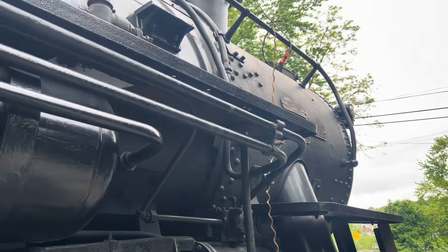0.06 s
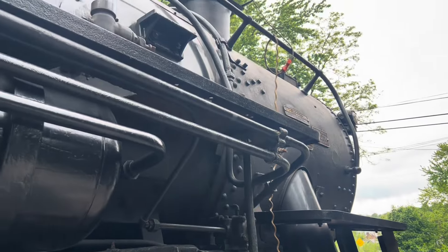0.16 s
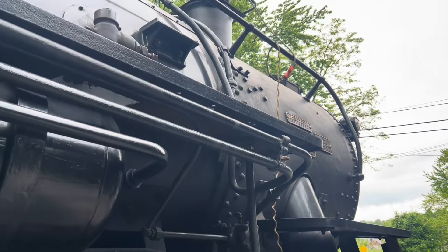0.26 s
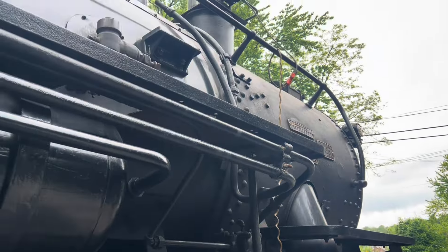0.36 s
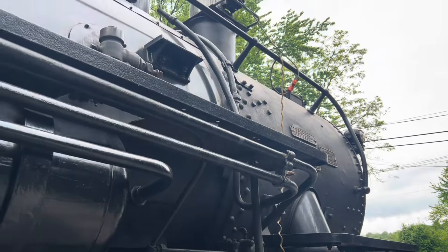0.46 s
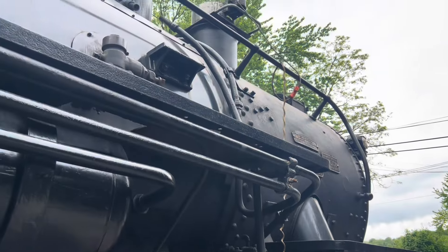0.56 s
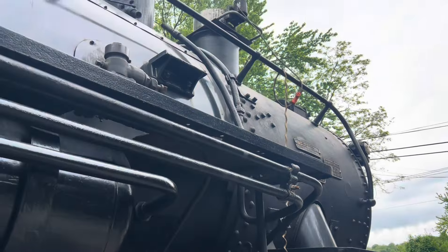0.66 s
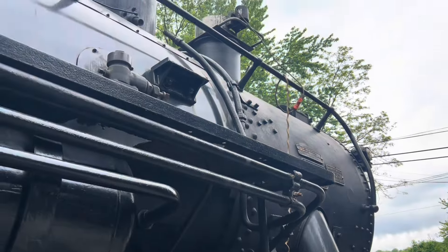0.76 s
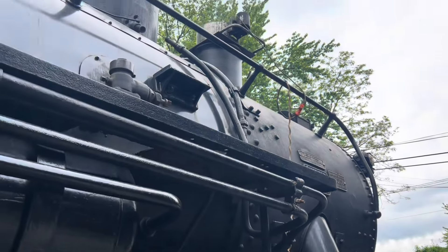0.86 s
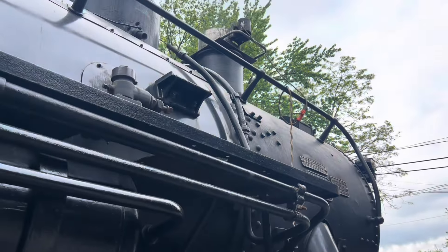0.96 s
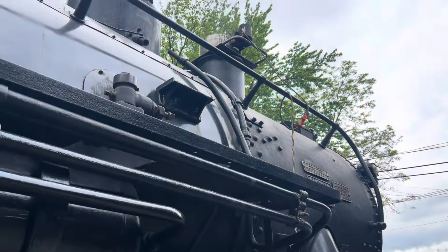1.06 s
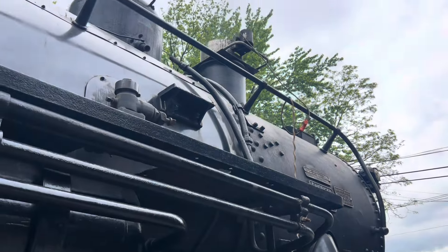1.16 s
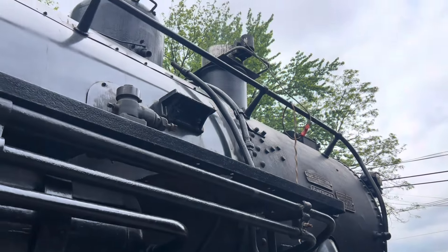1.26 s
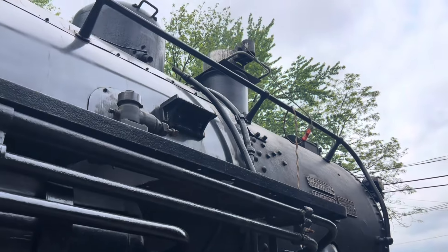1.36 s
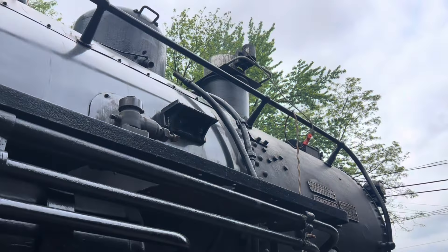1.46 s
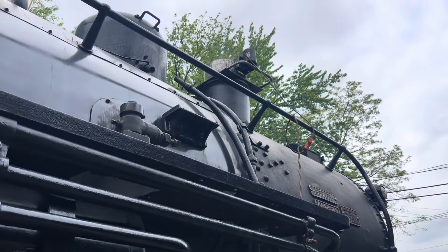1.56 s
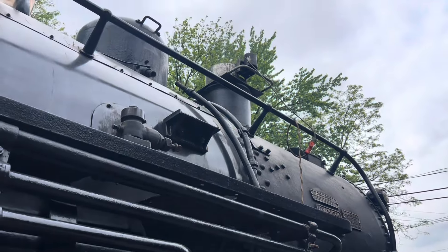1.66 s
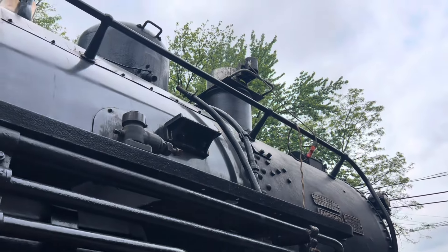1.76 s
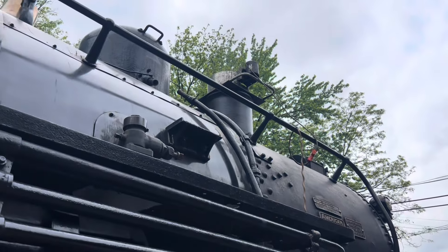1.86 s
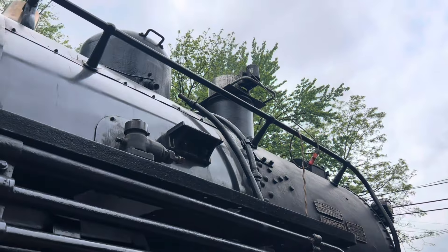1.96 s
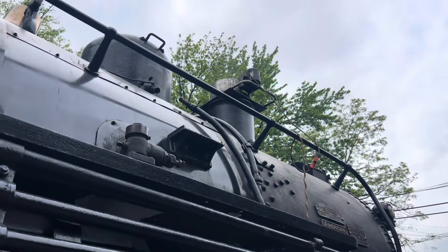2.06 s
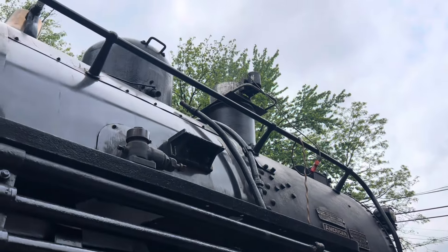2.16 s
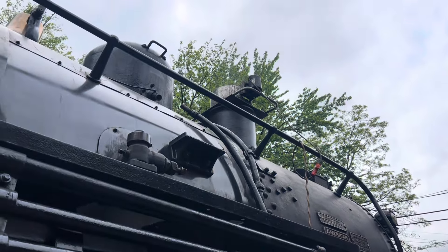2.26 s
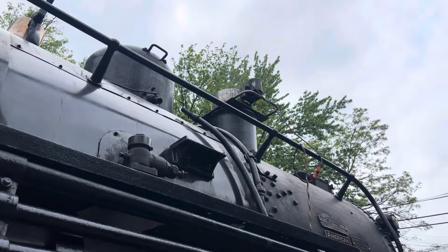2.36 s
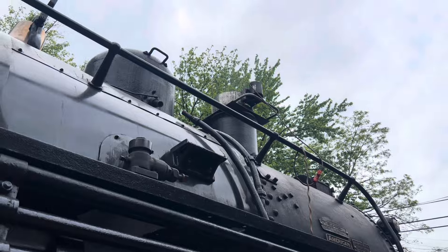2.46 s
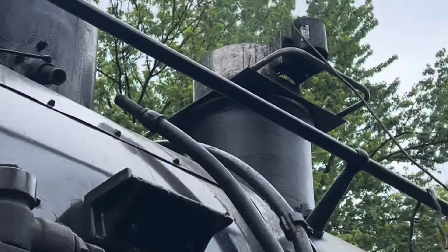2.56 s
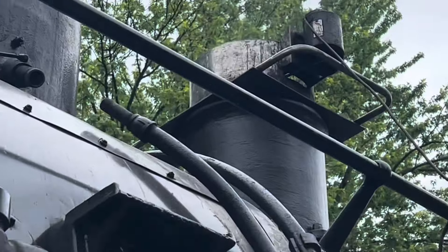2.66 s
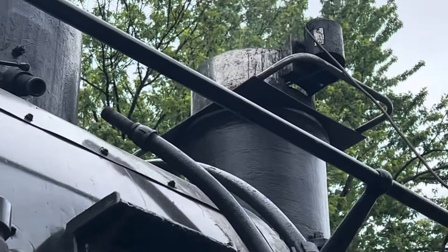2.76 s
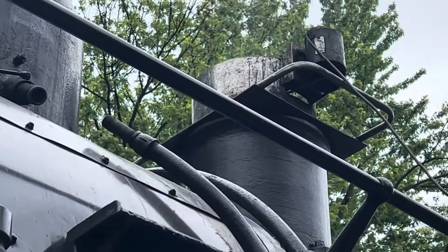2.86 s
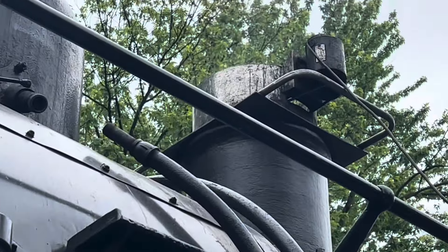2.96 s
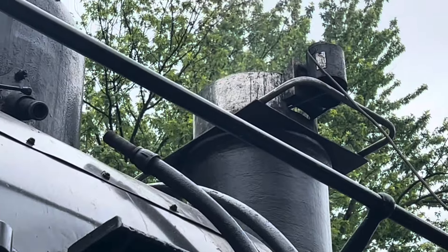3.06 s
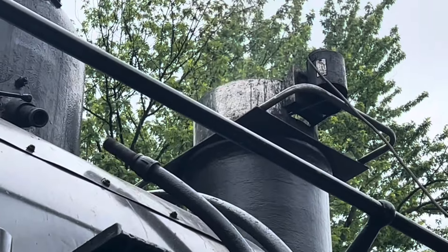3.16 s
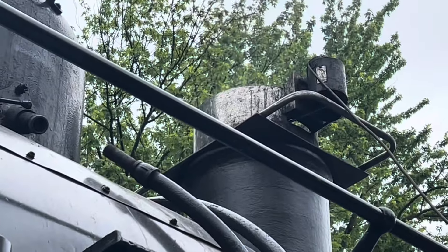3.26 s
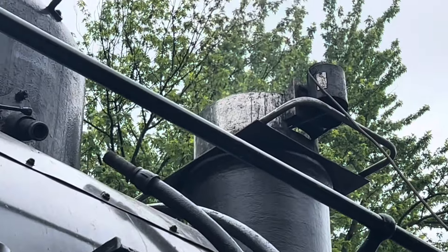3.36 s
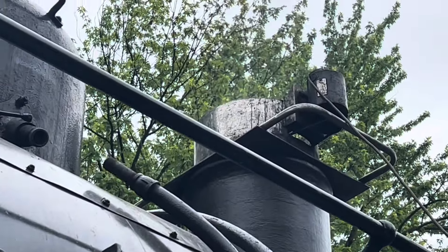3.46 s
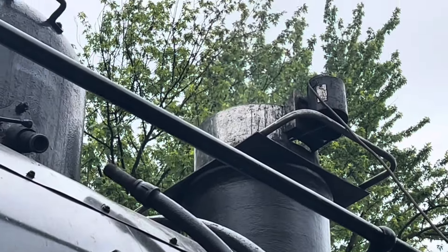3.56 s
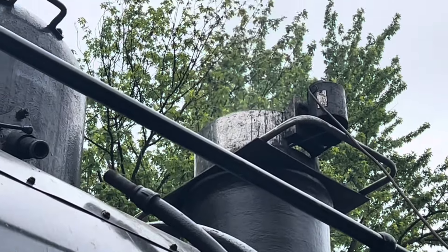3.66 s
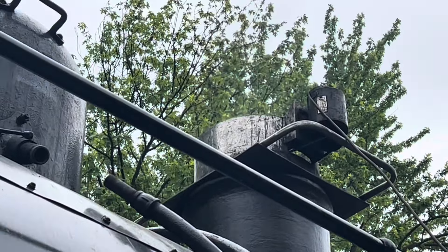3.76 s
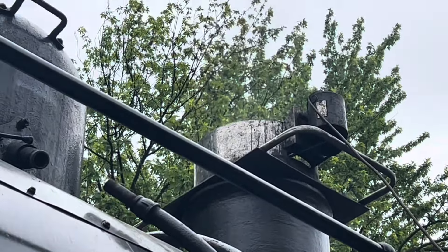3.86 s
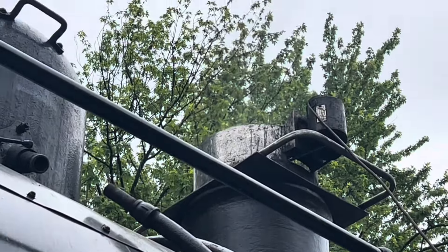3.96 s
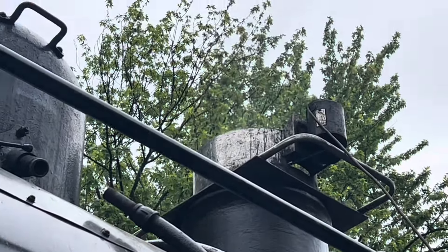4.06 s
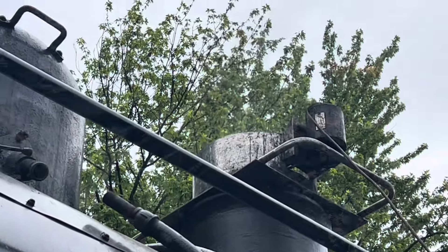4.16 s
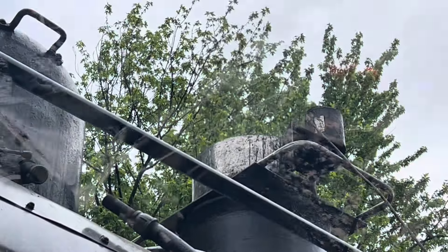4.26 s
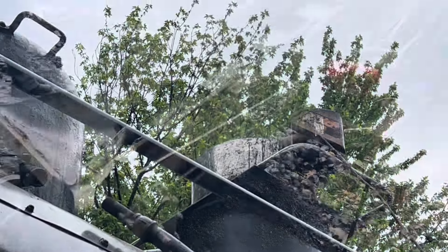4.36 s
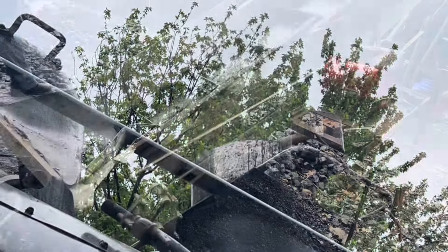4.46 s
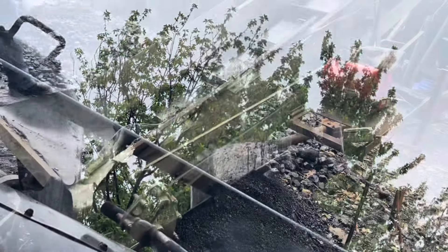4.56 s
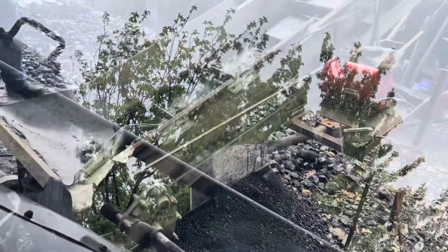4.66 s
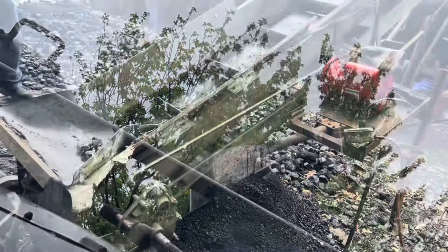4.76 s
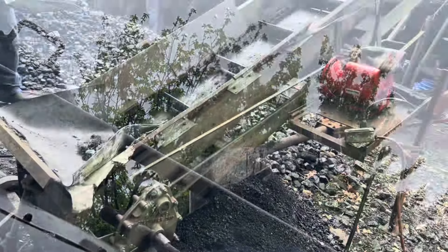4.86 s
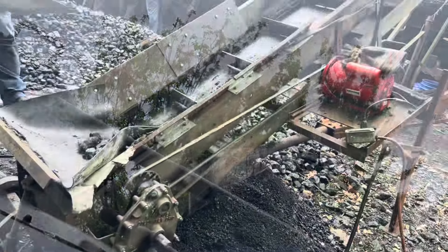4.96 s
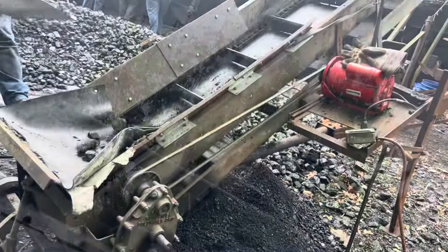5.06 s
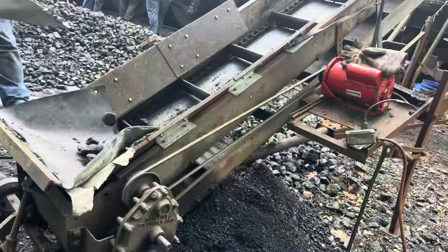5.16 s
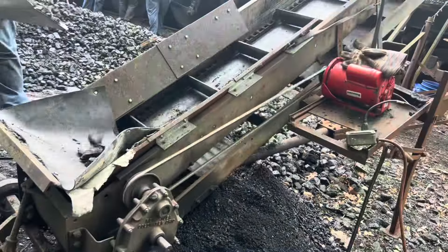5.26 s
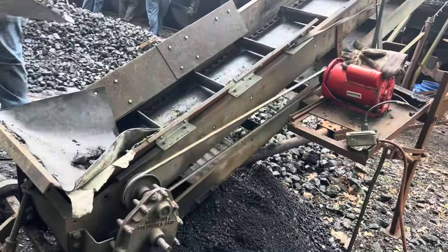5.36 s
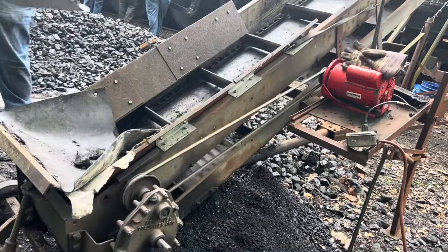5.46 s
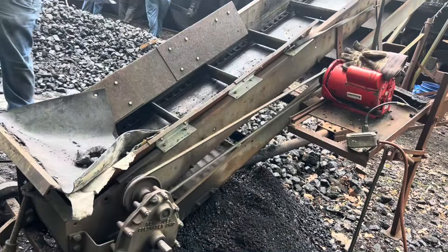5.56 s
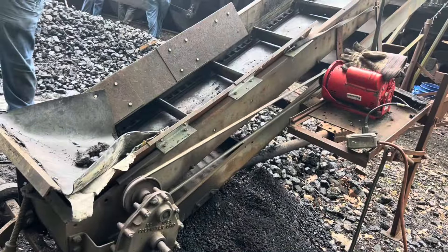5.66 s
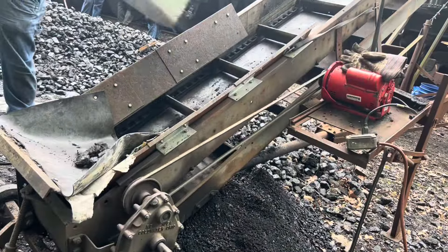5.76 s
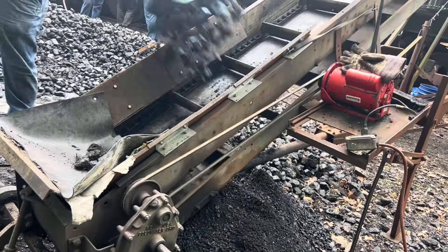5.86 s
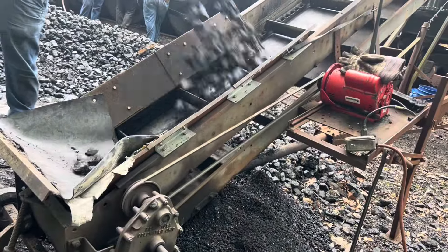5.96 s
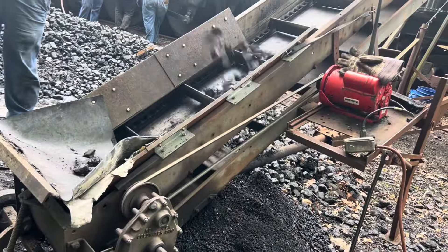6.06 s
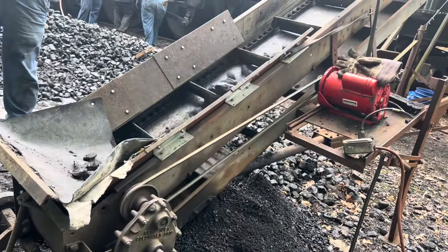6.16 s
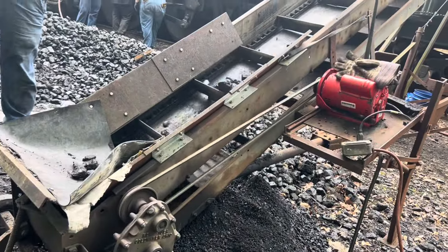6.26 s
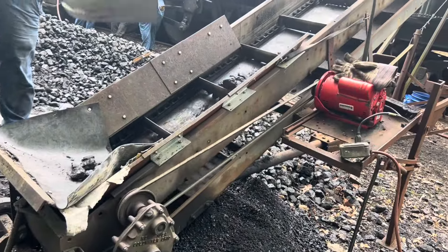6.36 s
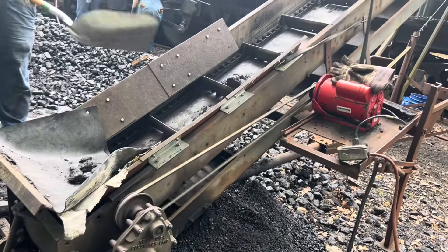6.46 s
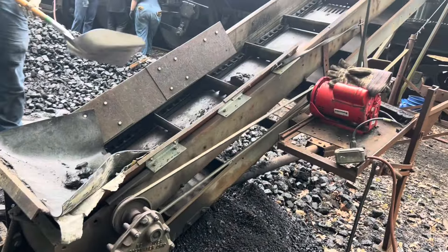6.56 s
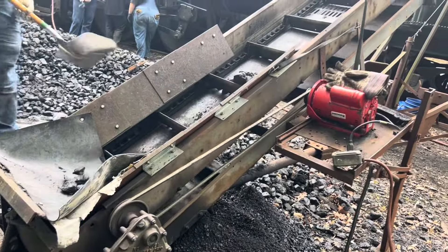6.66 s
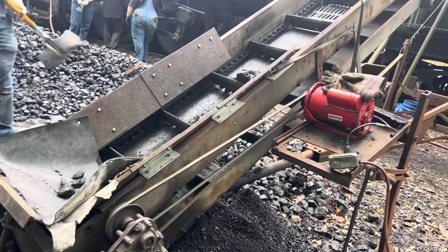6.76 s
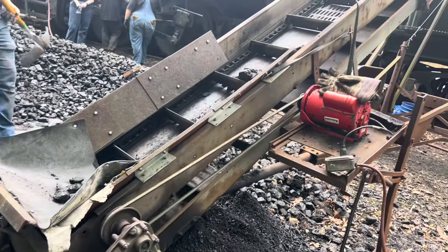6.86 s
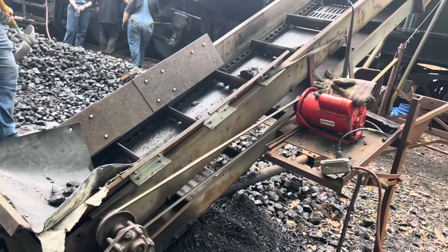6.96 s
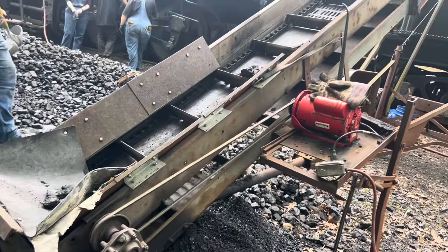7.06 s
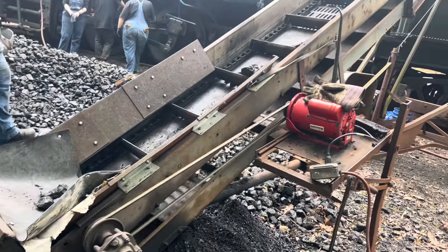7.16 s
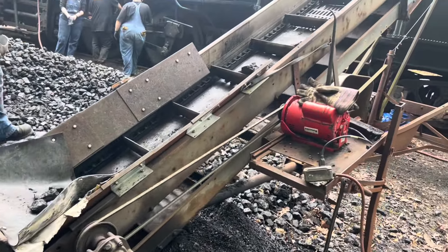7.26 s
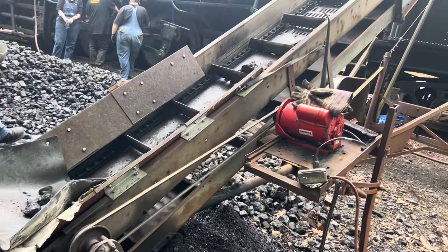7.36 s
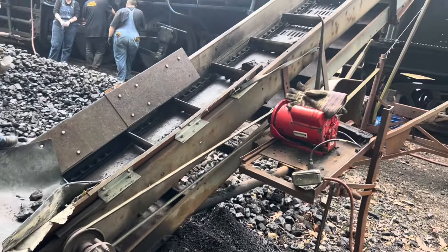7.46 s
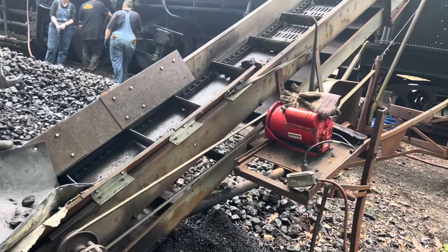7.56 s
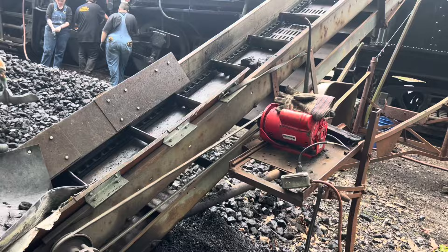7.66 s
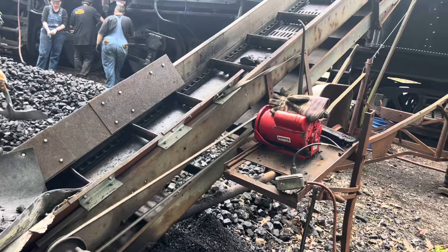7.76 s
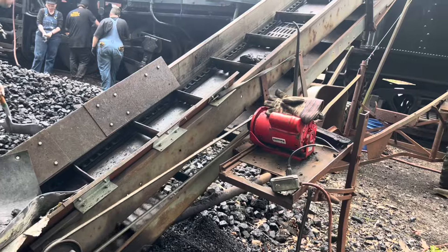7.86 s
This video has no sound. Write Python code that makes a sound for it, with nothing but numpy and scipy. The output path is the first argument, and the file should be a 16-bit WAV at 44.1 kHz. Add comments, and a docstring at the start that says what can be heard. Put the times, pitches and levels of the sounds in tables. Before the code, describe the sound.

A low steam-valve moan wavers and sags over hissing steam, then fades into a rattling coal conveyor struck by a crashing shovelful of coal.

```python
"""A steam valve moans, sagging in pitch and rising again, over the hiss of a standing locomotive.
Moan: a gliding fundamental with pipework-coloured overtones; steam and draught: filtered noise.
It cross-fades to a coal conveyor rattling along a steel trough: random impacts through steel spectra.
A shovelful of coal crashes in; single lumps knock and clink before, during and after it."""
import sys
import numpy as np
from scipy import signal
from scipy.fft import rfft, irfft, next_fast_len
from scipy.io import wavfile
from scipy.ndimage import map_coordinates

SR = 44100
rng = np.random.default_rng(int(sys.argv[2]) if len(sys.argv) > 2 else 0)


def transcribe(u):
    """Save the signal u as a 16-bit wav file named by the first command-line argument.

    u: samples, shape (n,) or (channels, n), limited to [-1, 1]; the rate is SR.
    q: integer samples, one column per channel.
    """
    v = np.clip(np.atleast_2d(u).T, -1, 1)
    q = np.round(v * 32767).astype(np.int16)
    wavfile.write(sys.argv[1], SR, q)


N = 348831

# valve flutter: time_s, pitch_hz
MOAN_PITCH = [(0, 196), (.26, 214), (.5, 198.5), (.93, 195), (1.27, 201.5), (1.38, 196), (1.5, 204.5),
              (1.59, 196), (1.76, 205), (1.86, 167), (2.0, 178), (2.16, 164), (2.56, 171.5), (2.85, 170),
              (3.28, 160), (3.75, 117), (4.08, 117.5), (4.5, 201), (4.66, 213), (5.1, 198)]
# moan dips briefly: middle_s, length_s, fundamental_depth_db, overtone_depth_db
MOAN_DIPS = [(0.304, 0.19, 2, 0), (0.903, 0.2, 2.5, 5), (1.603, 0.1, 1, 4), (1.838, 0.12, 11, 9),
             (2.021, 0.1, 17, 11), (2.079, 0.075, 15, 6), (2.177, .11, 15, 9), (2.388, 0.18, 3.5, 1.5),
             (3.223, 0.76, 7.5, 1.5), (3.296, 0.2, 13, 2.5), (3.54, 0.075, 12, 4), (3.69, 0.31, 10, 1),
             (4.145, 0.21, 11, 1), (4.29, 0.19, 11, 1.5), (4.426, 0.094, 12, 3)]
# pipework colouring the overtones: frequency_hz, relative_level_db
PIPE_COLOUR = [(235, -24), (300, -24), (370, -39), (400, -44.5), (490, -41), (590, -41.5), (680, -42),
               (775, -37.5), (880, -38), (1080, -44), (1190, -41.5), (1370, -49.5), (1480, -51.5),
               (1600, -52.5), (1900, -59.5), (2080, -51), (2230, -55), (2400, -54), (2900, -59.5),
               (6000, -60)]
# narrow pipework resonances: centre_hz, width_hz, relative_level_db
PIPE_MODES = [(354, 41, -26), (482, 15.4, -35), (816, 50, -28), (1038, 72, -35)]
# steam strength: time_s, strength_db
STEAM_STRENGTH = [(0, 0), (.35, 0.5), (2.42, -2.5), (2.5, -3.5), (2.9, -2), (3.7, -6), (4.3, -5.5)]
# draught rumble: time_s, level_db; the low end also jumps up at 2.5 s, as the image narrows
DRAUGHT_LEVEL = [(0, -36), (.75, -37), (1.15, -42), (2.38, -40.5), (2.5, -34.5), (2.9, -41), (4.3, -38.5)]
# noise spectra of the locomotive: frequency_hz, relative_density_db (per Hz)
RUMBLE_SPECTRUM = [(20, -57), (35, -16), (58, 0), (85, -4.5), (130, -4), (200, -24), (400, -19),
                   (1000, -56)]
RUSH_SPECTRUM = [(60, -21), (150, 1.5), (350, 7), (470, -5.5), (620, -0.5), (850, 3), (1220, 2),
                 (1440, -8.5), (1650, -5), (2500, -14), (3200, -15), (8000, -51.5)]
HISS_SPECTRUM = [(800, -22), (2000, -4.5), (3200, -1.5), (4400, 4.5), (5500, 2.5), (7000, 3.5),
                 (9000, -0.5), (10500, -38)]
SIZZLE_SPECTRUM = [(5000, -27), (7400, -5), (8400, 1.5), (9400, -0.5), (10200, -11.5), (15800, -12.5)]
# electric motor hum: frequency_hz, mean_level_db
MOTOR_HUM = [(120, -49.5), (240, -46), (360, -41.5), (480, -46.5)]
# conveyor rattle: time_s, strength_db
CHAIN_STRENGTH = [(5.0, 2.5), (5.2, 3.5), (5.42, 1.5), (5.55, 2.5), (5.78, 3.5), (6.05, 5), (6.22, -2),
                  (6.4, -2), (6.5, 0.5), (6.65, 0), (6.82, 1.5), (6.92, 2), (7.3, .5), (7.91, 1.5)]
# spectra of trough and coal: frequency_hz, relative_density_db (per Hz)
DRONE_SPECTRUM = [(25, -35), (58, -13), (100, -11.5), (180, -8), (220, 0.5), (280, -0.5), (360, -9),
                  (450, -9), (525, -3), (590, -11), (660, -11), (820, -18), (1500, -52.5)]
SCRAPE_SPECTRUM = [(400, -23), (750, -1.5), (970, 2), (1120, -2), (1320, 2.5), (1580, 3), (1800, -3),
                   (2200, -8.5), (2650, -6.5), (3200, -10), (4200, -18), (7000, -33.5)]
GRIT_SPECTRUM = [(2000, -12.5), (4000, 2), (5500, 2), (7000, 0), (8000, 7.5), (9000, 3.5), (9600, 3),
                 (10300, -8), (12000, -17), (15800, -23)]
THUD_SPECTRUM = [(50, -30), (120, -17), (180, 0), (250, 1), (360, -3.5), (450, -7.5), (540, -4.5),
                 (700, -12.5), (1000, -14), (2000, -36.5)]
CLATTER_SPECTRUM = [(400, -7), (800, -22), (1080, -6), (1190, 2), (1300, 4.5), (1550, 8), (1780, -3),
                    (2100, 1.5), (2700, -0.5), (3050, -5.5), (4200, -16.5), (8000, -37)]
# modes of the steel side plates: frequency_hz, relative_level_db
PLATE_MODES = [(1066, -1), (1101, 3), (1270, -10), (1357, -8), (1448, -11), (1518, -2), (2116, -3.5),
               (2310, -1.5), (2454, -1), (2578, 1), (2686, -7), (2728, -6.5)]
# biggest lumps of the shovelful: start_s, thud_db (before PUSH_DB), clatter_db
LUMP_BLOWS = [(5.817, -11, -26), (5.84, -18, -27), (5.887, -21, -17), (5.909, -19, -11), (5.937, -6, -20),
              (5.956, -8, -13.5), (5.969, -9, -22), (5.994, -3, -18), (6.018, -5, -17.5), (6.029, -17, -15),
              (6.04, -14.5, -26), (6.094, -19, -23), (6.113, -6.5, -18.5), (6.139, -15, -17.5)]
# lumps and flights knocking on the trough: start_s, thud_db (before PUSH_DB), clatter_db
TROUGH_KNOCKS = [(5.139, -15, -29), (5.2, -11, -35), (5.238, -20, -25.5), (5.573, -14, -26.5),
                 (5.602, -15, -38), (6.472, -26, -36), (6.783, -21, -28), (6.83, -18, -36),
                 (7.11, -19, -27.5), (7.253, -18, -30), (7.331, -12.5, -38), (7.411, -26, -33),
                 (7.61, -23, -37), (7.666, -18, -29), (7.7, -16, -33), (7.817, -14.5, -23),
                 (7.869, -17, -37)]
# coal and links clinking on steel: start_s, level_db, pitch_hz, t60_s
STEEL_CLINKS = [(5.198, -29, 8860, .06), (5.325, -26, 8800, 0.049), (5.667, -30, 8950, 0.055),
                (5.82, -12.5, 1513, .11), (5.84, -15.5, 1286, 0.22), (5.888, -15.5, 1088, 0.18),
                (5.894, -13, 2426, 0.11), (5.912, -20, 2310, .1), (5.955, -11, 1513, 0.083),
                (5.975, -17, 2594, 0.14), (6.027, -14, 2680, 0.074), (6.092, -20, 2600, 0.15),
                (6.114, -22, 1340, .1), (6.213, -20.5, 1510, 0.11), (6.254, -23, 1480, .12),
                (6.422, -26, 1520, 0.076), (6.489, -27, 8080, .06), (6.493, -26, 2780, 0.063),
                (6.784, -24, 8950, 0.035), (6.79, -23.5, 2940, 0.071), (7.0, -29, 1430, .06),
                (7.089, -27, 2620, .06), (7.285, -28, 2570, 0.066), (7.412, -26, 2360, 0.054),
                (7.518, -27, 1670, 0.072), (7.779, -26, 1380, .06), (7.842, -29, 1080, .06),
                (7.879, -32, 8560, .06)]
# faint distant squeaks: middle_s, length_s, pitch_hz, level_db
DISTANT_SQUEAKS = [(0.272, 0.32, 2334, -43), (1.34, 0.23, 2365, -39.5), (3.205, 0.11, 1670, -39.5),
                   (4.167, .14, 1936, -46)]
# balance of each place: frequency_hz, left_minus_right_db
LOCOMOTIVE_BALANCE = [(100, 0.4), (550, -4), (800, -1.5), (1020, 2.5), (1400, -1), (2400, -2.2), (4500, -2),
                      (6000, 0.5), (9000, -0.5)]
CONVEYOR_BALANCE = [(100, -0.5), (300, -3), (650, -2), (900, 5), (1300, 0.5), (1700, -0.5), (2700, -2.5),
                    (3900, 2.5), (7000, 3), (8700, 0)]
# left-right phase: frequency_hz, left_lead_rad
LEFT_LEAD = [(300, -.1), (550, .3), (870, 1.4), (1250, 0), (1850, -2.2), (2500, 0), (3100, 1.8), (3700, .5),
             (6000, .3), (7500, 1), (8500, 0), (10300, -3.1), (13800, -9.4), (15900, -13)]
# left-right likeness: frequency_hz, coherence (0 to 1)
COHERENCE = [(60, 1), (400, 0.97), (780, 0.7), (1000, 0.39), (1800, 0.41), (2400, 0.36), (3200, 0.54),
             (5200, 0.21), (7000, 0.6), (8400, 0.58), (9500, 1), (11000, 1)]
# narrowed stereo image: frequency_hz, gain_db
NARROW_CENTRE = [(1000, -0.5), (3200, 0.5), (5000, 0.5), (7000, 3.5), (9000, 0), (12000, -1)]
NARROW_SIDES = [(500, -2.5), (1500, -4.5), (2200, -11.5), (3500, -10), (5000, -31)]

# moan: levels at the reference pitch
REFERENCE_HZ = 200
FUNDAMENTAL_DB, FUNDAMENTAL_DB_PER_OCTAVE = -15, 15
OVERTONE_DB, OVERTONE_DB_PER_OCTAVE = -2, -2
OVERTONE_DB_PER_STEAM_DB = 1
WAVER_DB, WAVER_KNOTS_PER_S = 3, 12
BRIGHT_MIDDLE_S, BRIGHT_LENGTH_S, BRIGHT_DB = 2.6, 0.5, 8.3  # high overtones swell
FUNDAMENTAL_FADE_POWER, OVERTONE_FADE_POWER = 3.3, 2.6  # powers of the fading gain
# steam: levels at strength 0
RUSH_DB, HISS_DB, SIZZLE_DB = -32, -41.5, -45
RUSH_DB_PER_STEAM_DB, SIZZLE_DB_PER_STEAM_DB = 0.48, 1.5
# conveyor: levels at strength 0
DRONE_DB, SCRAPE_DB, GRIT_DB, TICKS_DB = -24.5, -33.5, -43, -51
RATTLE_DB, LOOSE_LUMPS_DB, LINKS_DB = -46, -42, -57
CHAIN_SWAY_DB, CHAIN_SWAY_KNOTS_PER_S = 1.5, 14  # uneven running
JOLT_DB, JOLT_KNOTS_PER_S = 2.5, 24  # rattle comes in clumps
PLATE_T60_S, PLATE_VARIES_DB, PLATE_KNOTS_PER_S = 0.18, 4, 16
# shovelful and single blows
POUR_S, POUR_ATTACK_S, POUR_HOLD_S, POUR_RELEASE_DB_PER_S = 5.805, 0.019, 0.32, 446
PUSH_DB = 18.5  # added to every thud
SHATTER_DB = -9  # relative to a knock's clatter
CRACK_DB, CRACK_T60_S = -10.5, 0.034  # relative to a clink's ring
# whole scene
CROSSFADE_S, CROSSFADE_LENGTH_S = 4.077, 1.42
NARROWING_S, NARROWING_LENGTH_S = 2.455, 0.075
TOP_HZ = 15900


def moan(count=20):
    """Valve flutter in steam flow: strong fundamental, louder when faster; overtones coloured by pipework."""
    pitch_hz, = curves(MOAN_PITCH)
    octaves = np.log2(pitch_hz / REFERENCE_HZ)
    dip_db, overtone_dip_db = sum(np.outer(depths_db, swell(middle_s, length_s))
                                  for middle_s, length_s, *depths_db in MOAN_DIPS)
    fading = crossfade()[0]
    # a slower flutter is less steady
    pitch_hz = pitch_hz * (1 + 0.0019 * (REFERENCE_HZ / pitch_hz) ** 2 * wobble(60))
    phase = 2 * np.pi * np.cumsum(pitch_hz) / SR
    # uneven beats roughen the high overtones
    shaky_phase = phase + 0.038 * (REFERENCE_HZ / pitch_hz) ** 2 * wobble(110)

    fundamental_db = FUNDAMENTAL_DB + FUNDAMENTAL_DB_PER_OCTAVE * octaves - dip_db
    fundamental = amp(fundamental_db) * np.sin(phase)

    top_db = BRIGHT_DB * swell(BRIGHT_MIDDLE_S, BRIGHT_LENGTH_S)
    overtones = np.zeros(N)
    for order in range(2, count):
        # lowest overtones waver least
        waver_db = WAVER_DB * min(1, (order / 6) ** 2) * wobble(WAVER_KNOTS_PER_S)
        gain = pipework(order * pitch_hz, order) * amp(waver_db + top_db * order / count)
        overtones += gain * np.sin(order * shaky_phase + rng.uniform(0, 2 * np.pi))
    effort_db = OVERTONE_DB_PER_OCTAVE * octaves + OVERTONE_DB_PER_STEAM_DB * curves(STEAM_STRENGTH)[0]
    overtones = overtones * amp(OVERTONE_DB + effort_db - overtone_dip_db)

    # echoes beat against the gliding overtones: flutter
    echo_tilt = [(300, -7.5), (800, -6.0), (1300, 2.0)]  # frequency_hz, gain_db
    scattered = filtered(echoes(overtones, t60_s=0.32), lambda hz: amp(along(echo_tilt, hz)))
    faded_fundamental = fading ** FUNDAMENTAL_FADE_POWER * fundamental
    faded_overtones = fading ** OVERTONE_FADE_POWER * (overtones + scattered)
    return np.sqrt(2) * (faded_fundamental + faded_overtones)


def pipework(hz, order):
    """Gain of a partial at this frequency: it swells as it glides through a resonance."""
    peaks = sum(amp(db) / (1 + (2 * (hz - centre_hz) / width_hz) ** 2)
                for centre_hz, width_hz, db in PIPE_MODES)
    # high orders of the flutter drive the resonances less
    return amp(along(PIPE_COLOUR, hz)) + peaks * min(1, 4 / order) ** 3.5


def locomotive():
    """Draught rumble and steam rush, hiss and sizzle as shaped noise; motor hum as wavering sines."""
    steam_db, = curves(STEAM_STRENGTH)
    rumble_db, = curves(DRAUGHT_LEVEL)
    t = np.arange(N) / SR
    sputter_db = 0.58 * wobble(16)
    rush_db = RUSH_DB + RUSH_DB_PER_STEAM_DB * steam_db + 0.59 * wobble(9)
    sizzle_db = SIZZLE_DB + SIZZLE_DB_PER_STEAM_DB * steam_db + sputter_db
    rumble = amp(rumble_db) * body(noise(), RUMBLE_SPECTRUM)
    rush = amp(rush_db) * body(noise(), RUSH_SPECTRUM)
    hiss = amp(HISS_DB + steam_db + sputter_db) * body(noise(), HISS_SPECTRUM)
    sizzle = amp(sizzle_db) * body(noise(), SIZZLE_SPECTRUM)
    hum = np.zeros(N)
    for hz, db in MOTOR_HUM:
        level = np.sqrt(2) * amp(db + 3.8 * wobble(3.79))
        hum += level * np.sin(2 * np.pi * hz * t + 0.26 * wobble(3.97))
    return crossfade()[0] * (rumble + rush + hiss + sizzle + hum)


def shovelful():
    """Big lumps thud, smaller ones clatter on the plates, chips shatter and chink."""
    chip_flow = pour(peak_s=6.0, peak_db=-26, slope_db_per_s=52)
    thud = pour(peak_s=5.98, peak_db=-15.5, slope_db_per_s=69) * impacts(500, spread_db=-4.5, life_s=0.012)
    clatter = pour(peak_s=5.9, peak_db=-17, slope_db_per_s=47) * impacts(260, spread_db=2.5, life_s=0.022)
    shatter = chip_flow * impacts(2300, spread_db=2.5, life_s=0.032)
    chips = chip_flow * amp(-8.5) * chinks(360, centre_hz=4680, scatter=0.5, t60_s=0.05)
    trough = struck(thud, THUD_SPECTRUM) + amp(-4.5) * struck(clatter, CLATTER_SPECTRUM)
    return trough + amp(-6) * plates(clatter) + struck(shatter, GRIT_SPECTRUM) + chips


def pour(peak_s, peak_db, slope_db_per_s):
    """Flow of one size of coal: sets in, thickens to its own peak, thins and stops."""
    t = np.arange(N) / SR
    attack = np.clip((t - POUR_S) / POUR_ATTACK_S, 0, 1)
    release_db = POUR_RELEASE_DB_PER_S * np.maximum(t - POUR_S - POUR_ATTACK_S - POUR_HOLD_S, 0)
    return attack * amp(peak_db - slope_db_per_s * np.abs(t - peak_s) - release_db)


def knocks(rows, thud_spectrum):
    """Single blows on the trough: a short push thuds; noise bursts clatter the plates and scatter chips."""
    start_s, thud_db, clatter_db = np.transpose(rows)
    thud = pushes(start_s, thud_db + PUSH_DB)
    clatter = bursts(start_s, clatter_db, t60_s=0.049)
    shatter = bursts(start_s, clatter_db + SHATTER_DB, t60_s=0.084)
    trough = struck(thud, thud_spectrum) + struck(clatter, CLATTER_SPECTRUM)
    return trough + amp(-11.5) * plates(clatter) + struck(shatter, GRIT_SPECTRUM)


def pushes(starts_s, levels_db):
    """One single-sample push for each blow."""
    return np.bincount(np.round(np.asarray(starts_s) * SR).astype(int), amp(levels_db), N)[:N]


def bursts(starts_s, levels_db, t60_s):
    """One dying burst of noise for each blow."""
    decay = amp(-60 * np.arange(SR // 3) / SR / t60_s)
    return signal.fftconvolve(pushes(starts_s, levels_db), decay)[:N] * noise()


def clinks():
    """A sharp contact cracks and rings a chain link or plate briefly in a close pair of modes."""
    ring, t = np.zeros(N + SR), np.arange(SR // 4) / SR
    for start_s, level_db, hz, t60_s in STEEL_CLINKS:
        pair = np.sin(2 * np.pi * hz * t) + 0.28 * np.sin(2 * np.pi * hz * 0.86 * t)
        envelope = amp(level_db - 60 * t / t60_s) * (1 - np.exp(-t / 0.00035))
        ring[round(start_s * SR):][:len(t)] += envelope * pair
    starts_s, levels_db, *_ = np.transpose(STEEL_CLINKS)
    crack = bursts(starts_s, levels_db + CRACK_DB, CRACK_T60_S)
    return ring[:N] + struck(crack, GRIT_SPECTRUM)


def conveyor():
    """Links and flights bump along the trough, scrape it, rattle plates, crush grit, tick and jingle."""
    strength_db = curves(CHAIN_STRENGTH)[0] + CHAIN_SWAY_DB * wobble(CHAIN_SWAY_KNOTS_PER_S)
    jolts = amp(JOLT_DB * wobble(JOLT_KNOTS_PER_S))
    drone = amp(DRONE_DB) * body(impacts(1600, spread_db=-5.0, life_s=0.1), DRONE_SPECTRUM)
    scrape = amp(SCRAPE_DB) * body(impacts(2300, spread_db=2.0, life_s=0.071), SCRAPE_SPECTRUM)
    grit = amp(GRIT_DB) * body(impacts(1400, spread_db=-0.5, life_s=0.072), GRIT_SPECTRUM)
    ticks = amp(TICKS_DB) * body(impacts(70, spread_db=4.5, life_s=0.02), GRIT_SPECTRUM)
    rattle = amp(RATTLE_DB) * jolts * plates(impacts(70, spread_db=3.0, life_s=0.019))
    lumps = amp(LOOSE_LUMPS_DB) * jolts * chinks(130, centre_hz=1648, scatter=0.55, t60_s=0.057)
    links = amp(LINKS_DB) * jolts * chinks(91, centre_hz=8200, scatter=0.15, t60_s=0.054)
    layers = drone + scrape + grit + ticks + rattle + lumps + links
    return crossfade()[1] * amp(strength_db) * layers


def plates(drive):
    """Side plates ring in modes damped by the coal on them; which modes lead keeps changing."""
    r = amp(-60 / (PLATE_T60_S * SR))  # decay per sample
    energy = sum(amp(db) ** 2 for hz, db in PLATE_MODES) / (2 * (1 - r * r))
    ringing = np.zeros((2, N))
    for hz, db in PLATE_MODES:
        w = 2 * np.pi * hz / SR
        mode = signal.lfilter([0, np.sin(w)], [1, -2 * r * np.cos(w), r * r], drive)
        ringing += amp(db + PLATE_VARIES_DB * wobble(PLATE_KNOTS_PER_S)) * mode
    mid, side = ringing / np.sqrt(energy)
    return np.array([mid + 0.48 * side, mid - 0.31 * side])


def chinks(rate_per_s, centre_hz, scatter, t60_s):
    """Loose bits ring for a moment, each at its own pitch and place; rms 1."""
    start, pitch, size, side = rng.random((int(rate_per_s * N / SR), 4)).T[:, :, None]
    t = np.arange(SR // 20) / SR
    hz = centre_hz * np.exp(scatter * (2 * pitch - 1))
    rings = amp(12.0 * size - 60 * t / t60_s) * np.sin(2 * np.pi * hz * t)
    index = (start * N).astype(int) + np.arange(len(t))
    channels = [np.bincount(index.ravel(), (rings * gain).ravel(), N)[:N]
                for gain in (0.5 + side, 1.5 - side)]
    return unit(np.array(channels))


def impacts(rate_per_s, spread_db, life_s):
    """Random contacts of scattered size, each a noise burst falling 60 dB in life_s; rms 1."""
    hits = rng.random(N) < rate_per_s / SR
    sizes = hits * amp(spread_db * np.minimum(rng.exponential(size=N), 4))
    t = np.arange(SR // 8) / SR
    power = signal.fftconvolve(sizes ** 2, amp(-60 * t / life_s) ** 2)[:N]
    return unit(np.sqrt(np.abs(power)) * noise())


def struck(drive, spectrum):
    """Blows coloured by a body; overall strength follows the drive."""
    return np.sqrt(np.mean(drive ** 2)) * body(drive, spectrum)


def squeaks():
    """Short sines with wavering phase swell and fade, with echoes."""
    t = np.arange(N) / SR
    sound = sum(amp(db) * swell(middle_s, length_s) * np.sin(2 * np.pi * hz * t + wobble(90))
                for middle_s, length_s, hz, db in DISTANT_SQUEAKS)
    return sound + echoes(sound, t60_s=0.25)


def echoes(x, t60_s):
    """Reflections from boiler, ground and nearby steel: a decaying noise tail, different at each ear."""
    t = np.arange(SR // 2) / SR
    tail = rng.standard_normal((2, len(t))) * amp(-60 * t / t60_s) * (1 - np.exp(-t / 0.0033))
    return signal.fftconvolve(np.atleast_2d(x), tail / np.linalg.norm(tail[0]), axes=1)[:, :N]


def body(drive, spectrum):
    """One or two excitations through one body, as a left-right pair whose mid has rms 1."""
    def response(hz):
        turn = np.arccos(np.clip(along(COHERENCE, hz), -1, 1)) / 2
        return causal(spectrum, hz) * np.array([np.cos(turn), np.sin(turn)])
    mid, side = filtered(drive, response)
    return np.array([mid + side, mid - side]) / np.sqrt(np.mean(mid ** 2) + 1e-20)


def causal(spectrum, hz):
    """Minimum-phase response of a body with this spectrum: it rings only after a blow."""
    cepstrum = irfft(np.log(amp(along(spectrum, hz))))
    half = len(cepstrum) // 2
    return np.exp(rfft(np.r_[cepstrum[0], 2 * cepstrum[1:half], np.zeros(half)]))


def filtered(x, response):
    """x times a response of frequency."""
    m = next_fast_len(N + SR // 2)
    return irfft(rfft(x, m) * response(np.fft.rfftfreq(m, 1 / SR)), m)[..., :N]


def noise():
    """Two unrelated white noises."""
    return rng.standard_normal((2, N))


def wobble(knots_per_s):
    """A smooth random curve through normal random knots."""
    at = np.arange(0, N + 32, 32)
    knots = rng.standard_normal(int(N * knots_per_s / SR) + 4)
    return np.interp(np.arange(N), at, map_coordinates(knots, [at * knots_per_s / SR]))


def swell(middle_s, length_s):
    """A smooth bump from 0 to 1 and back."""
    return np.cos(np.pi * np.clip((np.arange(N) / SR - middle_s) / length_s, -.5, .5)) ** 2


def curves(rows):
    """One value per sample for each column after the time."""
    time_s, *columns = np.transpose(rows)
    return [np.interp(np.arange(N) / SR, time_s, column) for column in columns]


def along(points, hz):
    """Read (frequency_hz, value) points on a log axis."""
    f, v = np.transpose(points)
    return np.interp(np.log(hz + 1), np.log(f + 1), v)


def amp(db):
    """Decibels to gain."""
    return 10 ** (np.asarray(db) / 20)


def unit(x):
    """Scale to rms 1."""
    return x / np.sqrt(np.mean(x ** 2) + 1e-20)


def crossfade():
    """Equal-power gains of the outgoing and incoming place."""
    share = np.clip((np.arange(N) / SR - CROSSFADE_S) / CROSSFADE_LENGTH_S, 0, 1)
    return np.sin(np.pi / 2 * (1 - share)), np.sin(np.pi / 2 * share)


def stereo_offset(x, balance):
    """Left and right differ in level and phase, by frequency."""
    half = np.array([[.5], [-.5]])
    return filtered(x, lambda hz: amp(half * along(balance, hz)) * np.exp(1j * half * along(LEFT_LEAD, hz)))


def narrowing(x):
    """The stereo image narrows: the treble draws to the centre."""
    wide = np.array([x[0] + x[1], x[0] - x[1]]) / 2  # mid, side
    narrow = filtered(wide, lambda hz: amp([along(NARROW_CENTRE, hz), along(NARROW_SIDES, hz)]))
    share = np.clip((np.arange(N) / SR - NARROWING_S) / NARROWING_LENGTH_S, 0, 1)
    mid, side = wide + (narrow - wide) * share
    return np.array([mid + side, mid - side])


def scene():
    """The locomotive, first wide and then narrowed, gives way to the conveyor."""
    engine = moan() + locomotive() + squeaks()
    blows = knocks(LUMP_BLOWS, THUD_SPECTRUM) + knocks(TROUGH_KNOCKS, DRONE_SPECTRUM)
    machine = shovelful() + blows + clinks() + conveyor()
    return narrowing(stereo_offset(engine, LOCOMOTIVE_BALANCE)) + stereo_offset(machine, CONVEYOR_BALANCE)


def record(dry):
    """Round off the loudest peaks, then cut everything from TOP_HZ up."""
    rounded = dry / (1 + np.abs(dry / .95) ** 6) ** (1 / 6)
    return filtered(rounded, lambda hz: hz < TOP_HZ)


dry = scene()
out = record(dry)
transcribe(out)
```